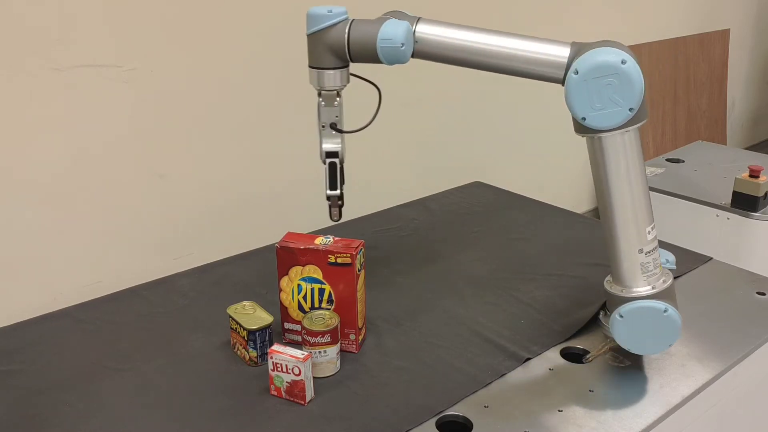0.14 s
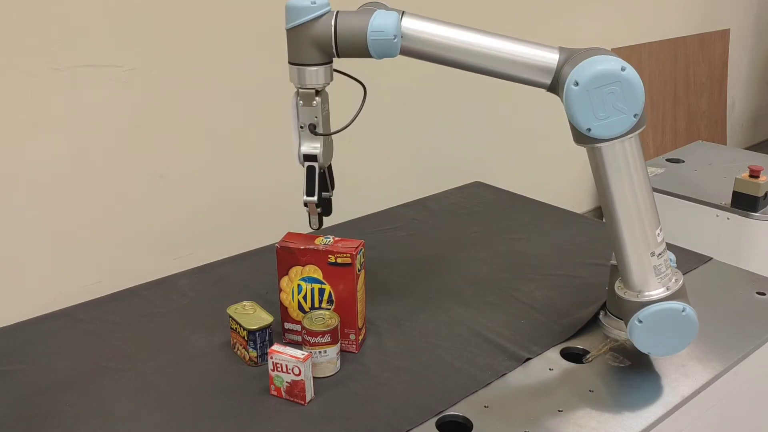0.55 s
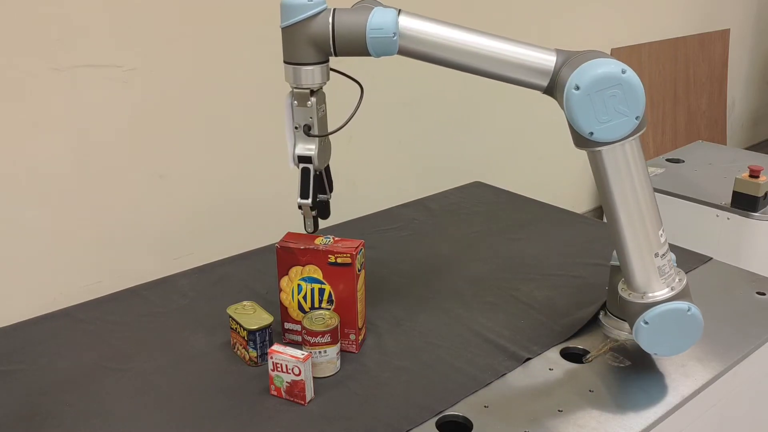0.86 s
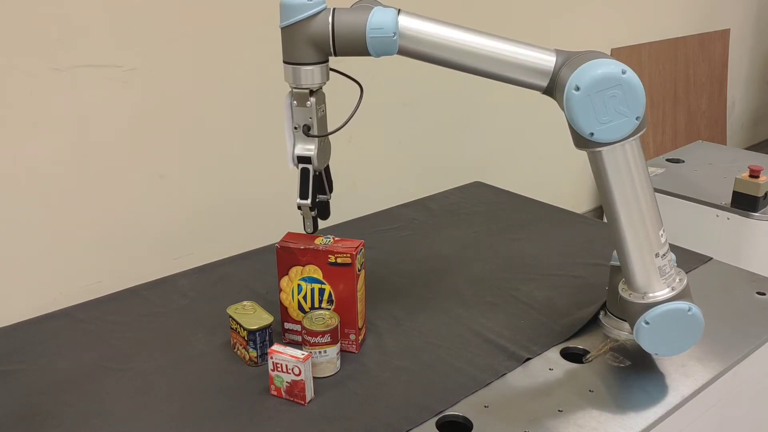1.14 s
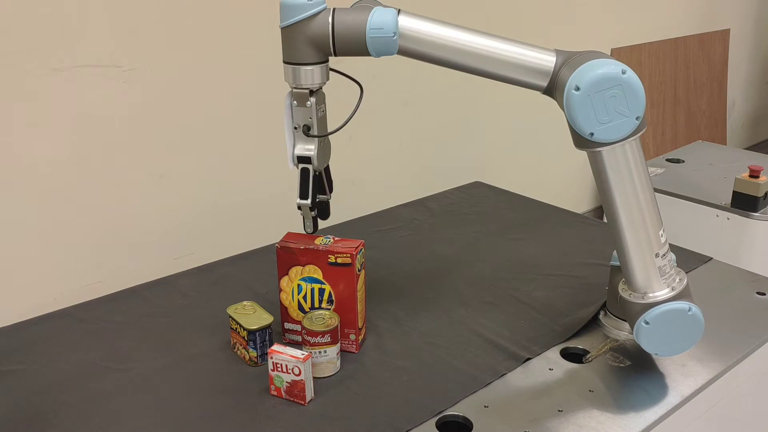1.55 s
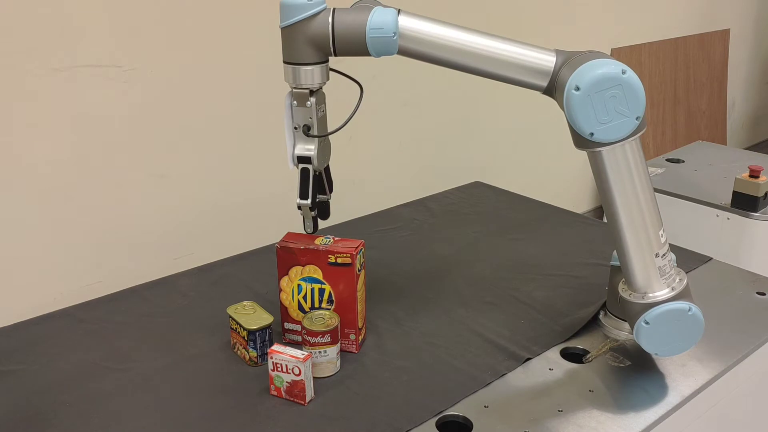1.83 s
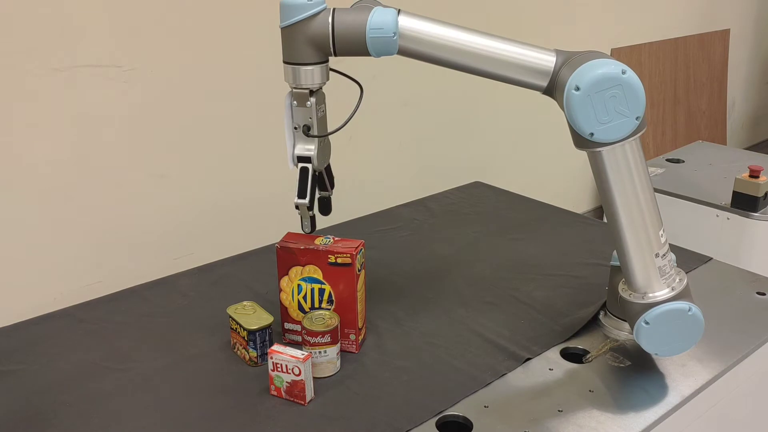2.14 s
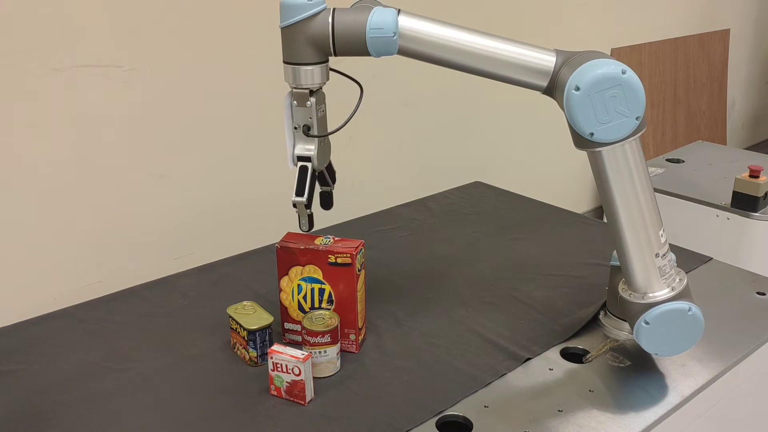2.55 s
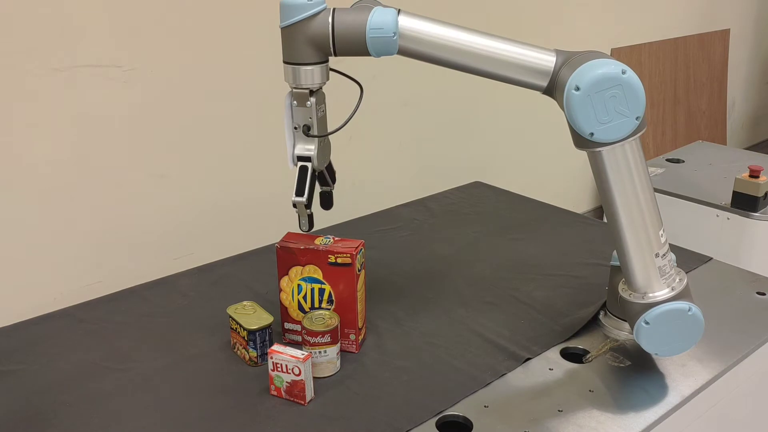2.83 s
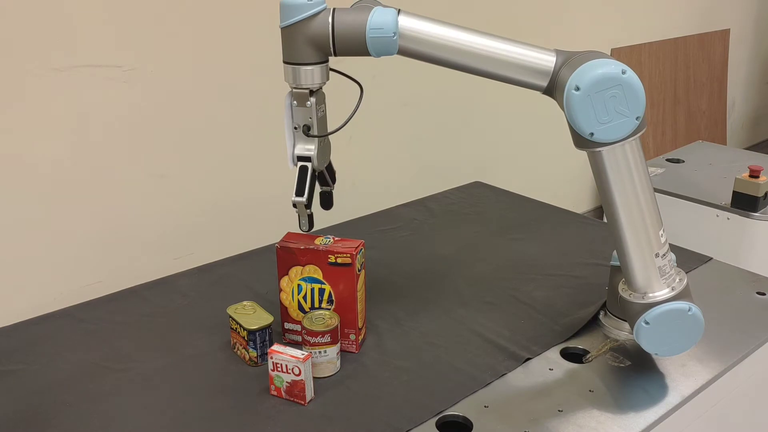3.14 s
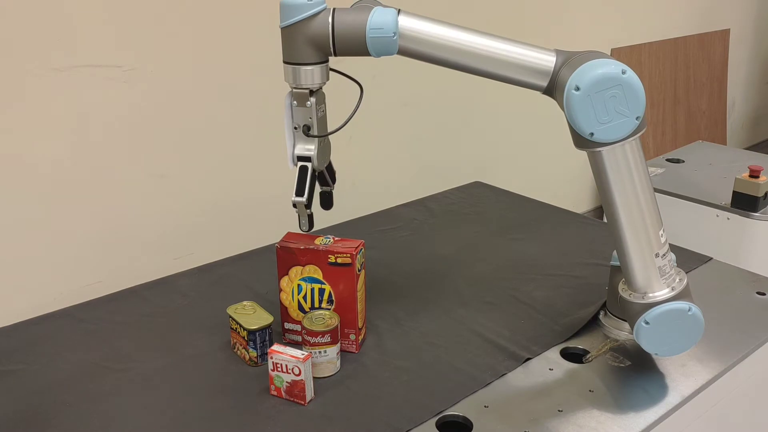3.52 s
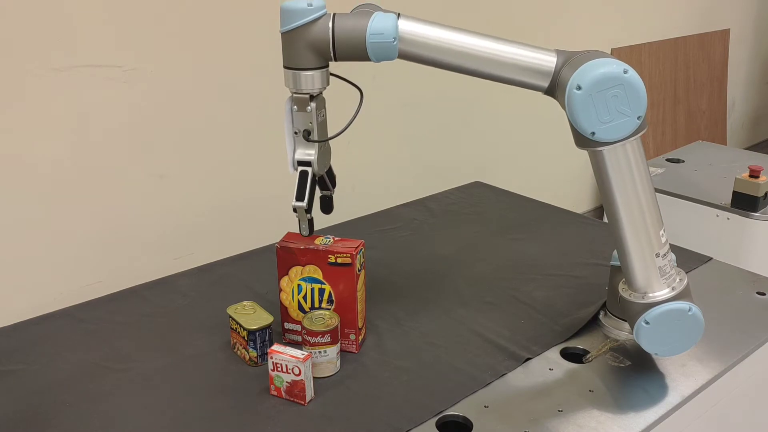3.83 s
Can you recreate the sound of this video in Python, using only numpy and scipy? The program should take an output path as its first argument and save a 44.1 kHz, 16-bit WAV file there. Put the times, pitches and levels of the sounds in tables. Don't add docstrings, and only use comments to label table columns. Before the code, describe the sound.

Robotic arm brake chatters sharply, loose parts snap and rattle, and later a small geared motor whirrs.

```python
import sys
import numpy as np
from scipy import signal
from scipy.fft import rfft, irfft
from scipy.io import wavfile
from scipy.ndimage import uniform_filter1d

SR = 44100
rng = np.random.default_rng(int(sys.argv[2]) if len(sys.argv) > 2 else 0)


def materialize(psi):
    bounded = np.clip(np.atleast_2d(psi).T, -1, 1)
    quanta = np.round(bounded * 32767).astype(np.int16)
    wavfile.write(sys.argv[1], SR, quanta)


def invert_db(x):
    u = np.asarray(x, float) / 20
    return 10 ** u


N = 175518
HZ = np.fft.rfftfreq(N, 1 / SR)

# [f/Hz, level/dB per Hz]
AIR_BED = [(20, -72.5), (150, -75.5), (300, -82), (700, -93), (1500, -96.5), (4000, -104), (9500, -104),
           (14000, -114)]
# [f/Hz, width/Hz, lift over the bed/dB]
FAN_HUMS = [(27.5, 8.8, 6.5), (58.5, 5, 7), (87.7, 5.9, 5), (105.7, 3.1, 9.5), (156.6, 13, 5.5),
            (231, 9.6, 5), (300.8, 2.9, 10), (414.3, 18, 4.5), (581.7, 17.3, 7.5), (605, 2.4, 13),
            (914, 11, 7)]
# [f/Hz, left-right likeness 0-1, lag of the right port/rad]
AIR_IMAGE = [(120, .998, 0), (300, .93, .08), (600, .72, .4), (900, .55, 1.0), (1300, .5, 2.0),
             (2000, .35, 1.8), (3000, .28, 2.5), (5000, .1, 3)]
SWELL_DB, PATCH_DB = -0.05, 1.48

# [t/s, f/Hz, level/dB]
DUCT_DRONE = [(0.0, 73.1, -47.5), (0.25, 79.6, -53.5), (0.42, 73.05, -41.5), (0.781, 76.54, -59.5),
              (0.85, 78.1, -61), (1.04, 73.4, -45.5), (1.34, 73.4, -50), (1.45, 77.3, -55),
              (1.58, 71.8, -52.5), (1.72, 79.5, -55), (1.83, 80.25, -49), (2.12, 72.6, -49),
              (2.45, 80.5, -54), (2.54, 72.2, -53), (2.89, 74.8, -43.5), (2.99, 69.57, -52.5),
              (3.31, 74.56, -49.5), (3.98, 76.8, -50)]
DRONE_WOBBLE_DB, DRONE_DB = 2.5, -2

# [t/s, level/dB, hold/s, t60/s]
BRAKE_HITS = [(.292, -56, 0.0022, .02), (.2945, -28, 0.0011, .008), (.2975, -29, .0008, 0.018),
              (.2995, -27, 0.0013, 0.015), (.3025, -30.5, 0.0021, 0.014), (.3083, -35.5, 0.00091, .018),
              (.312, -34.5, 0.0013, 0.022), (.320, -34.5, .001, .025), (.3275, -44, 0.0018, 0.036),
              (.341, -53, 0.0018, 0.034), (.348, -53, .002, .04), (.3555, -42, .001, 0.033),
              (.3625, -60, .002, .08), (.30, -47.5, 0.014, 0.12)]
# [f/Hz, level/dB]
BRAKE_TONE = [(1500, -29), (2900, -20), (3400, -33), (3900, -15.5), (6000, -11.5), (8000, -6), (9600, 0.5),
              (11500, -4.5), (14000, -9)]
# [f/Hz, level/dB, t60/s]
BRAKE_MODES = [(3070, -15, 0.033), (4700, -16, 0.04), (5030, -15, 0.04), (5560, -15, .03), (6350, -17, .04),
               (7700, -3, .03), (8300, -6, .03), (9110, -11, .04), (9600, 8, .07), (11100, -9, .04),
               (12700, -12, .04)]
# [f/Hz, level/dB]
BRAKE_LEAN = [(2000, 0.5), (5000, 2), (8000, -1), (12000, -1)]

# [t/s, level/dB, hold/s, t60/s]
SHELL_HITS = [(0.422, -64, 0.02, 0.087), (.645, -55, 0.011, 0.069), (0.818, -55.5, 0.018, 0.16),
              (0.882, -61, 0.016, .1), (1.075, -44, 0.009, 0.063), (1.097, -52, 0.0036, .04),
              (1.134, -45, 0.0081, 0.037), (1.152, -46, 0.0067, 0.031), (1.176, -49, 0.006, 0.037),
              (1.196, -46.5, 0.0077, 0.032), (2.982, -61.5, 0.032, .08)]
# [f/Hz, level/dB, t60/s]
SHELL_MODES = [(780, -12, .02), (921, 0, .055), (1055, -2, .035), (1200, -6, .02), (1350, -5, .02),
               (1540, -3, .025), (1640, -5, .025), (1850, -3, .03), (2100, -6, .025), (2320, -5, .03),
               (2440, -8, .025), (2750, -16, .015), (3300, -18, .012)]
# [t/s, level/dB, hold/s, t60/s]
LID_HITS = [
    (0.552, -53.5, 0.024, 0.086),
    (0.571, -58, 0.0052, 0.053),
    (0.589, -54.5, 0.014, 0.085),
    (1.228, -47, 0.0045, 0.057),
    (1.2435, -45.5, .004, .035),
    (1.252, -52, 0.013, 0.052),
    (1.282, -58, 0.0043, 0.031),
    (1.29, -55, 0.004, 0.04),
    (1.313, -64, 0.0036, 0.07),
]
# [f/Hz, level/dB, t60/s]
LID_MODES = [(1035, 0.5, .03), (1495, 4, 0.014), (1680, 1, 0.018), (1880, -1.5, 0.018), (2094, -2, 0.028),
             (2275, -3, 0.023), (2430, -22, 0.015), (2970, -16, 0.027), (3220, -17, 0.027)]
BLOW_DB, SHELL_LOW_HZ = 19, 714
SHELL_LAG_S, SHELL_SAME = .00039, .92

# [t/s, level/dB, hold/s, t60/s]
COUPLING_HITS = [(.4225, -44, 0.0091, 0.076), (.434, -47, .003, 0.077), (.453, -54, .004, 0.056),
                 (.46, -54, 0.072, .1), (.815, -64, 0.024, .2), (.5447, -48, 0.0059, 0.039),
                 (.56, -44.5, 0.0049, 0.043), (.572, -52.5, 0.0073, .06), (.592, -54, .008, .07),
                 (.640, -56, 0.0065, 0.078), (.7246, -55, 0.0053, 0.16), (1.0733, -44.5, 0.0032, 0.043),
                 (1.1332, -45.5, 0.0037, 0.038), (1.1741, -49, .003, 0.066), (1.197, -54, .003, 0.094),
                 (1.2255, -52.5, 0.015, 0.13), (1.6, -68, .002, .03), (2.988, -57.5, 0.004, 0.077),
                 (3.184, -60.5, 0.0024, 0.054)]
# [f/Hz, level/dB]
COUPLING_TONE = [(1000, -6), (2200, -2), (2900, -1.5), (3600, -2.5), (4400, -2), (5200, -1), (6000, -1),
                 (7500, 0.5), (11500, -0.5), (14000, -6.5)]
# [f/Hz, level/dB, t60/s]
COUPLING_MODES = [(2840, -34, 0.0079), (4400, -8, 0.0083), (5210, 8, 0.012), (6980, 7, 0.017),
                  (9500, 2, 0.075)]
METAL_RING_DB, METAL_SAME = -12.5, 0.28

MOTOR_ON_S, MOTOR_OFF_S, SPIN_UP_S, COAST_T60_S, MOTOR_DB = 1.885, 2.466, .05, 0.36, -57.5
END_STOP_S, END_STOP_DB = 2.555, -59
MESH_HZ, START_SHARE = 915, .88
WANDER, JITTER = .004, .010
TOOTH_WOBBLE_DB, TOOTH_FUZZ_HZ = 2.2, 100
BRUSH_VALLEY_DB = 11
MOTOR_LAG_RAD, MOTOR_SAME, MOTOR_LEFT_DULL_HZ = 2.26, 0.45, 10900
# [multiple, left level/dB, right level/dB]
TOOTH_HARMONICS = [(2, -17, -15), (3, -11, -8), (4, -11, -9), (5, -4, -4), (6, -1, -3), (7, -3, -7),
                   (8, -2, 0), (9, -4, -3), (10, -3, 0), (11, -6, 1), (12, -10, -4), (13, -12, -8),
                   (14, -14, -9), (15, -12, -6)]
# [f/Hz, level/dB]
HOUSING_TONE = [(900, -30), (2750, -2), (4200, -8.5), (6000, -4), (7800, -1.5), (10000, 3), (12000, -6.5),
                (14000, -21)]

# [f/Hz, t60/s]
ROOM_DECAY = [(500, 0.33), (3000, 0.59), (9000, 0.34)]
METAL_ROOM_DB, SHELL_ROOM_DB, MOTOR_ROOM_DB = -1.5, -4.5, -4

# [f/Hz, level/dB]
LEFT_PORT = [(100, -3), (900, -3.5), (3000, 0), (5500, -1), (9600, -1.5), (11000, -3.5), (14000, -8.5)]
PORT_HZ, PORT_WIDTH_HZ, PORT_DB = 7970, 910, 9.5
EDGE_HZ = 14270


def evened(x):
    return x / np.sqrt(np.mean(x ** 2) + 1e-20)


def read(points, hz, axis=1):
    rows = np.array(points)
    return np.interp(np.log(hz + 1), np.log(rows[:, 0] + 1), rows[:, axis])


def colour(x, gain):
    return irfft(rfft(x) * gain, N)


def drift(hz):
    return evened(colour(rng.standard_normal(N), 1 / (1 + (HZ / hz) ** 2)))


def pair(a, b, same, lag):
    same = np.clip(same, 0, 1)
    shared = colour(a, same * np.exp(-1j * lag))
    return np.array([a, shared + colour(b, np.sqrt(1 - same ** 2))])


def ring(x, modes):
    t = np.arange(SR // 4) / SR
    tap = sum(invert_db(db - 60 * t / t60) * np.sin(2 * np.pi * hz * t) for hz, db, t60 in modes)
    return signal.oaconvolve(x, tap / np.linalg.norm(tap))[:N]


def bursts(rows):
    t, power = np.arange(N) / SR, np.zeros(N)
    for s, db, hold, t60 in rows:
        rise = np.clip((t - s) / 0.00044, 0, 1)
        decay = invert_db(db - 60 * np.clip(t - s - hold, 0, 1) / t60)
        power += (rise * decay) ** 2
    return np.sqrt(power)


def room(x, db):
    taps = np.zeros((2, SR // 2))
    slots = np.arange(200, SR // 2 - 20, 20)
    at = slots + rng.integers(0, 20, (2, len(slots)))
    np.put_along_axis(taps, at, rng.choice([-1., 1.], at.shape), 1)
    hz, t, z = signal.stft(taps, SR, nperseg=128)
    decay = invert_db(-60 * t / read(ROOM_DECAY, hz)[:, None])
    tail = signal.istft(z * decay, SR, nperseg=128)[1]
    tail = tail / np.linalg.norm(tail[0])
    return invert_db(db) * signal.fftconvolve(x[None], tail, axes=1)[:, :N]


def air():
    hums = sum(lift * np.exp(-((HZ - hz) / width) ** 2) for hz, width, lift in FAN_HUMS)
    gain = invert_db(read(AIR_BED, HZ) + hums) * np.sqrt(SR / 2)
    a, b = [colour(rng.standard_normal(N), gain) for _ in range(2)]
    bed = pair(a, b, read(AIR_IMAGE, HZ), read(AIR_IMAGE, HZ, axis=2))
    hz, t, z = signal.stft(bed, SR, nperseg=1024)
    patches = uniform_filter1d(rng.standard_normal(z.shape[1:]), size=10, axis=0)
    patches = evened(uniform_filter1d(patches, size=5, axis=1))
    z = z * invert_db(PATCH_DB * patches * (hz > 700)[:, None])
    return signal.istft(z, SR, nperseg=1024)[1][:, :N] * invert_db(SWELL_DB * drift(11))


def drone():
    t, (s, hz, db) = np.arange(N) / SR, np.transpose(DUCT_DRONE)
    level = invert_db(np.interp(t, s, db) + DRONE_DB + DRONE_WOBBLE_DB * drift(21))
    phase = 2 * np.pi * np.cumsum(np.interp(t, s, hz)) / SR
    return level * np.sqrt(2) * np.sin(phase)


def brake():
    left, right = metal(BRAKE_HITS, BRAKE_TONE, BRAKE_MODES)
    return np.array([colour(left, invert_db(read(BRAKE_LEAN, HZ))), right])


def metal(rows, tone, modes):
    level, gain = bursts(rows), invert_db(read(tone, HZ))
    gain = gain / np.sqrt(np.mean(gain ** 2))
    hits = [level * rng.standard_normal(N) for _ in range(2)]
    a, b = [colour(v, gain) + invert_db(METAL_RING_DB) * ring(v, modes) for v in hits]
    return pair(a, b, METAL_SAME, 2 * np.pi * HZ * SHELL_LAG_S) + room(a, METAL_ROOM_DB)


def clacks(rows, modes):
    level, blows = bursts(rows), np.zeros(N)
    for s, db, hold, t60 in rows:
        blows[round(s * SR)] = invert_db(db + BLOW_DB)
    scrapes = [level * invert_db(1.9 * drift(240)) * rng.standard_normal(N) for _ in range(2)]
    low_cut = 1 / np.sqrt(1 + (SHELL_LOW_HZ / (HZ + 1)) ** 8)
    a, b = [colour(ring(v + blows, modes), low_cut) for v in scrapes]
    return pair(a, b, SHELL_SAME, 2 * np.pi * HZ * SHELL_LAG_S) + room(a, SHELL_ROOM_DB)


def snaps():
    return metal(COUPLING_HITS, COUPLING_TONE, COUPLING_MODES)


def mesh(turns):
    teeth = np.zeros((2, N))
    slow, fast = TOOTH_WOBBLE_DB * drift(21.6), drift(TOOTH_FUZZ_HZ)
    for k, left_db, right_db in TOOTH_HARMONICS:
        phase = 2 * np.pi * (round(k) * turns + rng.random())
        a, b = rng.integers(0, N, 2)
        level = invert_db([left_db + np.roll(slow, a), right_db + np.roll(slow, b)])
        tone = np.cos([phase, phase - MOTOR_LAG_RAD])
        fuzz = np.array([np.roll(fast, a), np.roll(fast, b)]) * np.sin(phase)
        teeth += level * (tone + fuzz)
    return evened(teeth)


def brushes():
    valleys = BRUSH_VALLEY_DB * np.sin(np.pi * HZ / MESH_HZ) ** 4 / (1 + (HZ / 7000) ** 6)
    gain = invert_db(read(HOUSING_TONE, HZ) - valleys)
    a, b = [evened(colour(v, gain)) for v in rng.standard_normal((2, N))]
    return pair(a, b, MOTOR_SAME, MOTOR_LAG_RAD)


def motor():
    t = np.arange(N) / SR
    running, coasting = np.clip(t - MOTOR_ON_S, 0, 9), np.clip(t - MOTOR_OFF_S, 0, 9)
    spin = 1 - (1 - START_SHARE) * np.exp(-3 * running / SPIN_UP_S)
    hz = MESH_HZ * spin * (1 + WANDER * drift(7.9) + JITTER * drift(252))
    turns = np.cumsum(hz) / SR
    level = invert_db(MOTOR_DB + 0.86 * drift(11) - 60 * coasting / COAST_T60_S)
    level *= np.clip((t - MOTOR_ON_S) / SPIN_UP_S, 0, 1)
    level *= np.clip((END_STOP_S - t) / 0.017 + 1, 0, 1)
    stop = bursts([(END_STOP_S, END_STOP_DB, .004, .08)])
    whirr = level * mesh(turns) + (level + stop) * brushes()
    left, right = whirr + room(whirr[1], MOTOR_ROOM_DB)
    return np.array([colour(left, 1 / np.sqrt(1 + (HZ / MOTOR_LEFT_DULL_HZ) ** 8)), right])


def scene():
    plastic = clacks(SHELL_HITS, SHELL_MODES) + clacks(LID_HITS, LID_MODES)
    return air() + drone() + brake() + plastic + snaps() + motor()


def roll_off(x):
    return signal.sosfilt(signal.butter(12, 14780, fs=SR, output="sos"), x)


def record(dry):
    resonance = PORT_DB * np.exp(-((HZ - PORT_HZ) / PORT_WIDTH_HZ) ** 2)
    left = colour(dry[0], invert_db(read(LEFT_PORT, HZ) + resonance))
    edge = np.clip((EDGE_HZ - HZ) / 60 + .5, 0, 1)
    mix = np.array([colour(left, edge), colour(dry[1], edge)])
    return roll_off(mix)


dry = scene()
out = record(dry)
materialize(out)
```